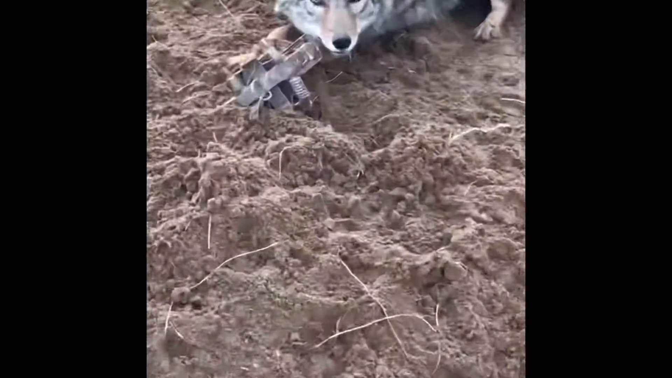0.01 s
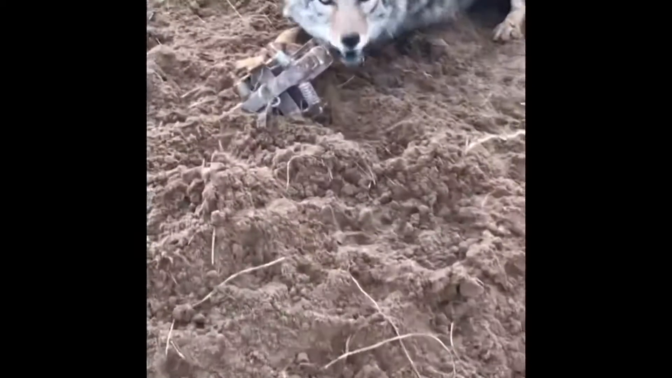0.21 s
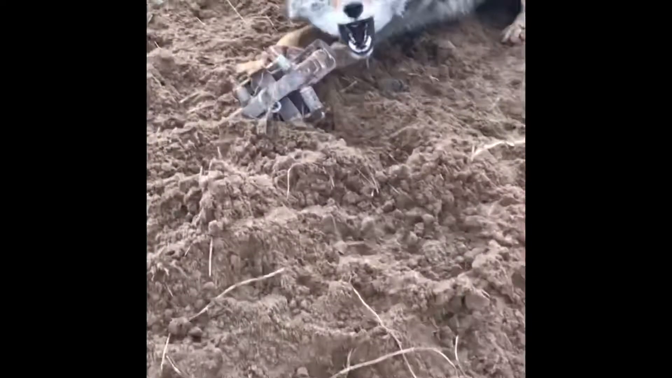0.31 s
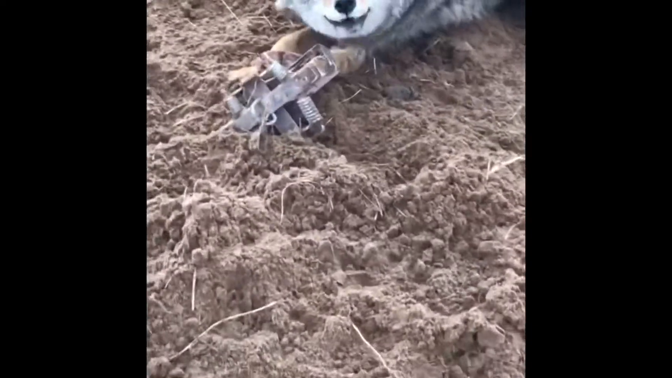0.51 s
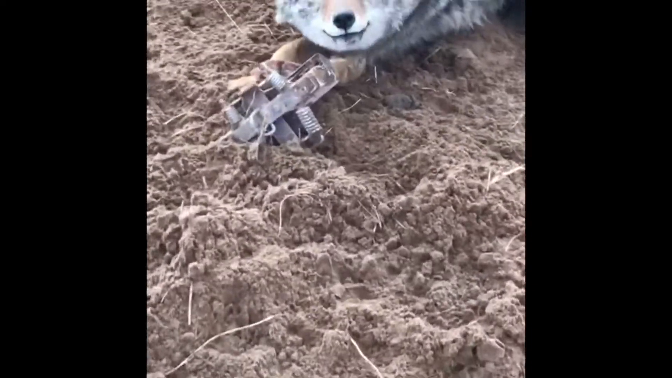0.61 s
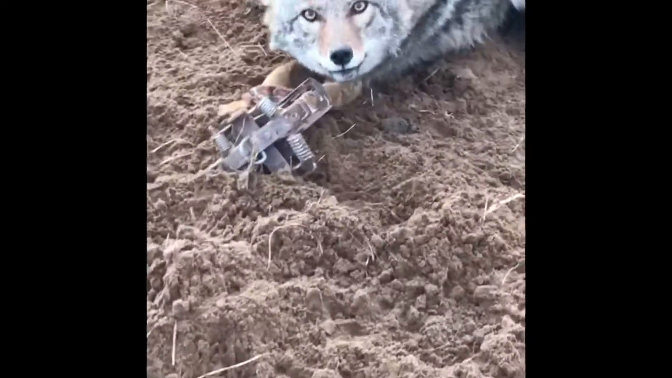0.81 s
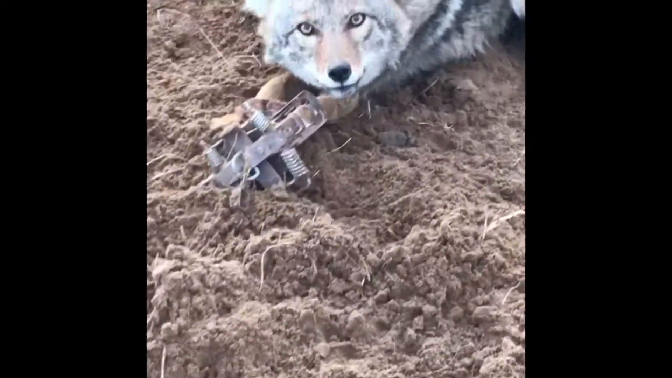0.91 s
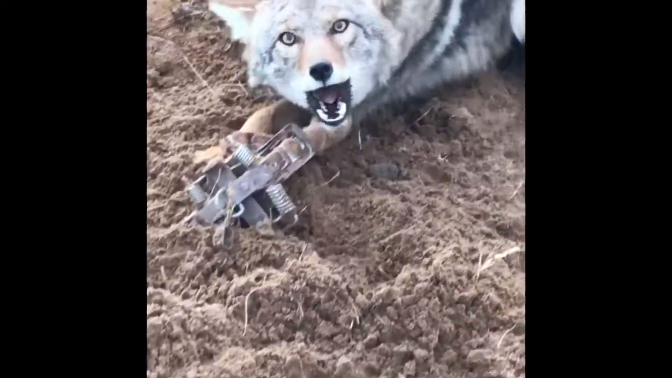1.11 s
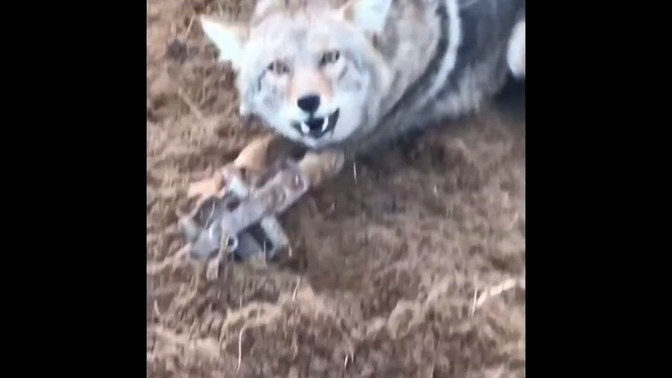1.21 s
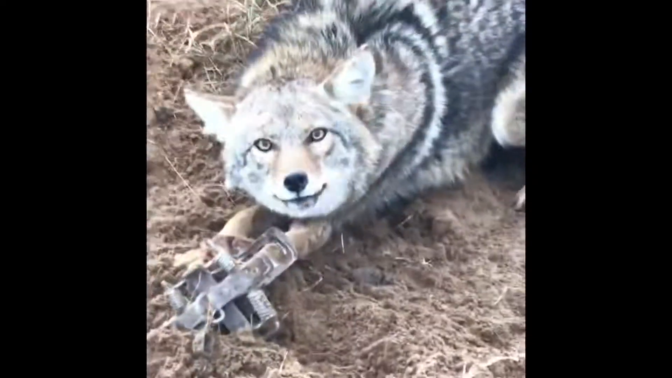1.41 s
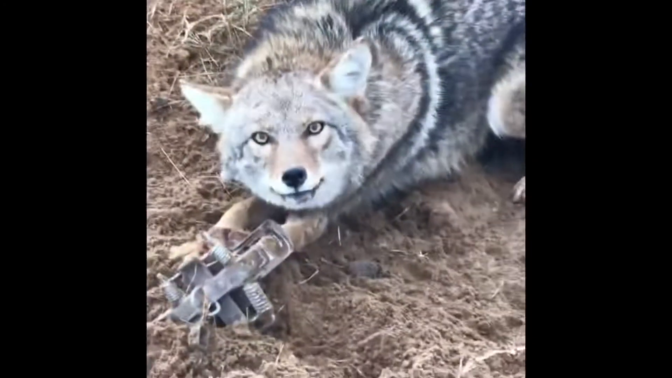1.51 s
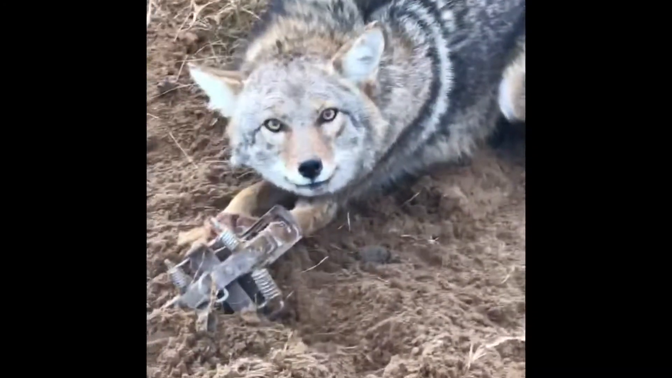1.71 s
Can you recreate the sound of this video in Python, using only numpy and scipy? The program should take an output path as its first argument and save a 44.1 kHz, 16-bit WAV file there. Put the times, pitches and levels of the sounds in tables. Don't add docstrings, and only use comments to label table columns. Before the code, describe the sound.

A coyote barks twice, close to a phone microphone in an open field. Each bark is short, rough and breathy, arching in pitch; low wind buffeting thumps between them over a faint steady hiss.

```python
import sys
import numpy as np
from scipy import signal
from scipy.io import wavfile
from scipy.ndimage import uniform_filter1d

SR = 44100
rng = np.random.default_rng(int(sys.argv[2]) if len(sys.argv) > 2 else 0)


def level_to_linear(level):
    exponent = np.asarray(level, float) / 20
    return 10 ** exponent


def materialize(psi):
    bounded = np.clip(np.atleast_2d(psi).T, -1, 1)
    quanta = np.round(bounded * 32767).astype(np.int16)
    wavfile.write(sys.argv[1], SR, quanta)


N = 79380

# frequency in Hz, level in dB per Hz.
HISS_COLOUR = [(60, -58), (250, -16.5), (550, -14), (1000, -2), (1400, -5), (2200, -20.5), (5000, -48),
               (16000, -51)]
# time in seconds, level in dB.
HISS_LEVEL = [(0, -46), (.6, -46.5), (.9, -44.5), (1.35, -44), (1.8, -44.5)]
# time in seconds, level in dB.
DRONE_LEVEL = [(0, -83.5), (.6, -67), (1.15, -54), (1.8, -55)]
DRONE_HZ, DRONE_WIDTH_HZ = 306, 206

# time in seconds, level in dB.
WIND_LEVEL = [(0.0, -44.5), (0.294, -35), (0.314, -44), (0.446, -22), (0.486, -39), (0.51, -19.5),
              (0.54, -12.5), (0.596, -33.5), (0.762, -31), (0.816, -30), (0.866, -33), (1.006, -20.5),
              (1.182, -40), (1.638, -37), (1.664, -43.5), (1.8, -35)]
# frequency in Hz, level in dB per Hz.
CALM_COLOUR = [(12, -70), (20, 4), (107, 3.5), (141, -0.5), (167, -4.5), (395, -18.5), (450, -19.5),
               (580, -55), (990, -120)]
GUST_COLOUR = [(12, -46.5), (20, -42.5), (54, 5.5), (102, -1.5), (315, -13), (381, -24), (844, -34),
               (900, -27.5), (1170, -71.5), (1980, -120)]
CALM_DB, GUST_DB, LUMPS_DB = -33, -22.5, 2.5
# start in seconds, peak in dB, ring in Hz, length in seconds.
EDDIES = [(0.381, -30, 75, 0.035), (0.413, -31, 124, 0.013), (0.438, -19, 78.2, 0.0084),
          (0.463, -27, 130.5, 0.0078), (0.51, -60, 142, 0.051), (0.529, -17.5, 91.6, 0.022),
          (0.545, -30, 73.3, 0.045), (0.511, -33, 302, 0.0054), (.537, -31.5, 374, .006),
          (0.792, -30.5, 66, 0.048), (1.648, -31.5, 77.2, 0.057), (1.728, -32, 55.6, 0.019)]

# time in seconds, fundamental in dB, overtones in dB, breath in dB,
# mouth opening from 0 to 1.
FOLDS_1 = [
    (.198, -51, -64, -78, 0),
    (0.218, -17, -23.5, -46.5, 0),
    (0.249, -7.5, -10.5, -26, 0.77),
    (0.265, -25.5, -13.5, -25.5, 0.73),
    (.29, -16, -12, -24, 0.89),
    (0.308, -22, -9.5, -26, 0.8),
    (.327, -21, -21.5, -34.5, 0.86),
    (0.34, -27.5, -35.5, -44.5, 0.6),
    (.385, -69, -60, -56, .6),
]
FOLDS_2 = [
    (.962, -43, -81.5, -96, 0.25),
    (.993, -19.5, -23, -41.5, 0.26),
    (1.022, -11.5, -9, -31.5, 0.63),
    (1.048, -13.5, -16.5, -19, 1),
    (1.074, -19.5, -9.5, -20.5, 0.79),
    (1.091, -21, -13, -26, 0.87),
    (1.104, -24.5, -24.5, -33.5, 1),
    (1.113, -29.5, -29.5, -45.5, 0.47),
    (1.15, -41, -50, -63, 0.52),
]
# time in seconds, pitch in Hz.
PITCH_1 = [(.198, 385), (.217, 402), (.249, 455), (.264, 451), (.29, 431), (.309, 384), (.327, 358),
           (.339, 335), (.385, 294)]
PITCH_2 = [(.962, 286), (.993, 334), (1.022, 415), (1.045, 468), (1.055, 461), (1.069, 433), (1.078, 398),
           (1.09, 330), (1.101, 282)]
# time in seconds, pitch in Hz, level in dB.
SECOND_1 = [
    (0.235, 516.3, -33),
    (0.262, 604, -3.5),
    (0.289, 654.4, -5),
    (0.311, 628.4, -23.5),
    (0.326, 716, -20),
    (0.334, 710, -33.5),
]
SECOND_2 = [
    (0.982, 475, -40.5),
    (0.992, 512, -24.5),
    (1.002, 553.8, -18.5),
    (1.042, 621.6, -10.5),
    (1.051, 649, -13),
    (1.066, 620, -78),
]
# multiple of its pitch, level in dB.
SECOND_TONES = [(1, 3.5), (2, -6), (3, -14.5), (4, -18.5)]
# time in seconds, noise share from 0 to 1, strong-weak pulse share from 0 to 1.
ROUGH_1 = [(.2, .6, .3), (.245, .7, .25), (.27, .75, .2), (.31, .65, .2), (.335, .6, .1), (.345, .9, 0)]
ROUGH_2 = [(.97, .75, .15), (1.042, .72, .1), (1.054, .04, 0), (1.082, .04, 0), (1.092, .2, .2),
           (1.104, .3, .1), (1.113, .85, 0)]
# time in seconds, opening from 0 to 1.
LIPS_1 = [(.21, .95), (.225, 0.83), (.25, 0.44), (.265, 0.9), (.285, 0.94), (.31, 0.87), (.325, 0.98),
          (.35, 0.6)]
LIPS_2 = [(.98, .5), (1.005, .55), (1.03, 0.74), (1.042, 0.85), (1.065, 0.93), (1.085, 0.88), (1.105, 0.79),
          (1.13, .55)]
FOLD_JITTER = (.025, .003)
SECOND_JITTER = (.02, .022)
# resonance in Hz, width in Hz, level in dB, share it drops when shut.
THROAT = [(669, 400, 0, 0.29), (908, 150, -2, 0.29), (1330, 429, 5.5, 0.3), (1875, 350, 3, 0.19),
          (2323, 310, -1.5, 0.14), (2634, 330, -13, 0.043), (3076, 400, -10, 0.081)]
# time in seconds, resonance in Hz, gain in dB, length in seconds.
SWELLS = [(0.227, 1870, 3, 0.0085), (.24, 1290, 2, 0.016), (0.286, 1290, 1.5, 0.021),
          (0.238, 904, 3, 0.011), (0.2736, 2300, 8, 0.026), (.25, 2965, 9, 0.015), (0.6, 2300, 0, .01),
          (1.025, 1870, 3.5, .01), (1.03, 2965, 6.5, .01), (1.05, 2300, 5.5, 0.018),
          (1.055, 1870, -14, 0.016), (1.066, 2700, 6.5, 0.012), (1.094, 1870, 3, 0.0072),
          (1.09, 1290, -2.5, 0.0044), (0.92, 2300, 0, 0.013)]
# resonance in Hz, width in Hz, level in dB,
# share it drops when shut.
PASSAGES = [(4400, 650, 3, 0.22), (6803, 890, 5, 0.25), (8926, 1200, 2, 0.22), (9940, 740, -7, .02),
            (11530, 1000, -7.5, 0.1), (14000, 3000, -9.5, 0.023)]
# time in seconds, frequency in Hz, gain in dB,
# length in seconds.
SURGES = [(.212, 9300, 4.5, .005), (.222, 6700, 4, 0.013), (.243, 6700, 4.5, 0.0067), (.247, 9300, 5, 0.02),
          (.252, 4400, 7, 0.012), (.279, 4400, 9.5, 0.0072), (.278, 9300, 4.5, .008),
          (.292, 6700, 5.5, 0.0081), (.297, 4400, 10, 0.0085), (.32, 6700, 12.5, 0.0038),
          (.255, 14000, 5, .012), (1.012, 6700, 13.5, 0.0099), (1.02, 9300, 6, .014),
          (1.033, 6700, -9, 0.0056), (1.055, 9300, 6, 0.019), (1.06, 4400, 6.5, 0.0089),
          (1.062, 14000, 0.5, 0.0074), (1.075, 11200, 2.5, 0.023), (1.098, 6700, 9.5, 0.015),
          (1.005, 4400, -11, 0.012), (.36, 9300, -9.5, 0.031), (.365, 6700, -3, 0.018),
          (1.13, 9300, -3.5, 0.013), (1.13, 6700, -10, .016)]
COUPLING = .5
CHAOS = .2
PUFF_SHARE = 1.2
PULSES_IN_BREATH = .6
OPEN_AIR_DB, TONE_FLUTTER_DB = -17, 4.5
PATCHY_DB, THROAT_FLICKER_DB = 2.5, 3
SHUT_DB_PER_KHZ, WANDER = -2.5, .015
VOICE_CUT_HZ, THROAT_TOP_HZ = 330, 3400

FIELD_HZ, FIELD_WIDTH_HZ, FIELD_DB, FIELD_T60_S = 3880, 1300, -40, .22

# time in seconds, level in dB.
INTAKE = [
    (.92, -85),
    (.94, -72),
    (.965, -72),
    (.982, -66),
    (.995, -90),
]
# frequency in Hz, width in Hz, level in dB.
INTAKE_LINES = [(4640, 250, 0), (9800, 400, -8.5)]
# time in seconds, peak in dB.
CREAK = [(1.1258, -45), (1.1374, -49), (1.1518, -47), (1.1702, -60), (1.1847, -58), (1.1914, -62),
         (1.2034, -58), (1.2101, -55), (1.2276, -50), (1.2441, -51), (1.2625, -57), (1.2805, -54),
         (1.2924, -62), (1.3194, -58), (1.3374, -67)]
# frequency in Hz, width in Hz, level in dB.
CREAK_MODES = [(3570, 850, 1.5), (3960, 600, 1)]

DUCK_FROM_DB, DUCK_SHARE, RECOVER_DB_PER_S = -21, .3, 61
MIC_CUT_HZ, EDGE_HZ = 51, 15780
LIMIT, SELF_NOISE_DB = 1.12, -77


def evened(x):
    return x / np.sqrt(np.mean(x ** 2) + 1e-20)


def read(points, hz):
    f, value = np.transpose(points)
    return np.interp(np.log(hz + 1), np.log(f + 1), value)


def add(mix, s, sound):
    part = mix[round(s * SR):][:len(sound)]
    part += sound[:len(part)]


def columns(table, t):
    rows = np.transpose(table)
    return [np.interp(t, rows[0], c) for c in rows[1:]]


def resonate(x, hz, width):
    turn = np.exp(2j * np.pi * np.cumsum(hz * np.ones(len(x))) / SR)
    r = np.exp(-np.pi * abs(width) / SR)
    return 2 * (turn * signal.lfilter([1 - r], [1, -r], x / turn)).real


def resonate_twice(x, hz, width):
    return resonate(resonate(x, hz, width), hz, width)


def highpass(x, hz):
    return signal.sosfilt(signal.butter(2, hz, "high", fs=SR, output="sos"), x)


def wobble(count, size=150):
    return evened(uniform_filter1d(uniform_filter1d(rng.standard_normal(count), size), size))


def noise(spectrum, size=1024, patchy_db=0.):
    hz = np.fft.rfftfreq(size, 1 / SR)
    real, imag, patches = rng.standard_normal((4 * N // size + 5, len(hz), 3)).T
    patches = evened(uniform_filter1d(uniform_filter1d(patches, size=8, axis=0), size=10, axis=1))
    frames = (real + 1j * imag) * level_to_linear(read(spectrum, hz)[:, None] + patchy_db * patches)
    return evened(signal.istft(frames, nperseg=size, noverlap=3 * size // 4)[1][:N])


def hiss():
    t = np.arange(N) / SR
    drone = evened(resonate_twice(rng.standard_normal(N), DRONE_HZ, DRONE_WIDTH_HZ))
    wash = noise(HISS_COLOUR, patchy_db=1.3)
    return level_to_linear(columns(HISS_LEVEL, t)[0]) * wash + level_to_linear(columns(DRONE_LEVEL, t)[0]) * drone


def wind():
    level_db = columns(WIND_LEVEL, np.arange(N) / SR)[0]
    gustiness = np.clip((level_db - CALM_DB) / (GUST_DB - CALM_DB), 0, 1)
    calm = noise(list(CALM_COLOUR) + [(1500, -100), (5000, -140)], size=2048)
    gust = noise(list(GUST_COLOUR) + [(2500, -100), (5000, -140)], size=2048)
    rumble = np.sqrt(1 - gustiness) * calm + np.sqrt(gustiness) * gust
    out = level_to_linear(level_db - 4 + LUMPS_DB * wobble(N, size=500)) * rumble
    for s, db, hz, length in EDDIES:
        t = np.arange(0, 2 * length, 1 / SR)
        u = t / length
        swell = 4 * u * np.exp(-3 * u) * (1 - u / 2)
        ring = np.sin(2 * np.pi * hz * t * (1 - 0.12 * u))
        add(out, s, -level_to_linear(db + 12.0) * swell * ring)
    return out


def tract(drive, table, mouth, patchy_db=0., shut_db=0., surges=(), t=0):
    out = np.zeros(len(drive))
    for k, (f, width, db, drop) in enumerate(table):
        wander = WANDER * patchy_db / 3 * wobble(len(drive), size=400)
        centre = f * (1 - drop * (1 - mouth) + wander)
        band = resonate(resonate_twice(drive, centre, width), centre, 2 * width)
        surge_db = sum(gain_db * np.exp(-((t - s) / length) ** 2)
                       for s, hz, gain_db, length in surges if abs(hz / f - 1) < .08)
        muffle_db = shut_db * f / 1000 * (1.5 - mouth)
        flicker_db = patchy_db * wobble(len(drive), size=160)
        out += (-1) ** k * level_to_linear(db + surge_db + muffle_db + flicker_db) * band
    return evened(out)


def bark(folds, pitch, second, rough, lips, fold_jitter, second_jitter):
    t = np.arange(folds[0][0], folds[-1][0], 1 / SR)
    first_db, over_db, breath_db, mouth = columns(folds, t)
    hz = uniform_filter1d(columns(pitch, t)[0], size=200)
    rough, halved = columns(rough, t)
    lip_spread = columns(lips, t)[0]
    onset = (second[0][0] - .01, second[0][1], -70)
    ending = (second[-1][0] + 0.023, second[-1][1], -70)
    high_hz, high_db = columns([onset] + list(second) + [ending], t)

    turns = np.cumsum(hz * (1 + fold_jitter * wobble(len(t)))) / SR
    high = np.cumsum(high_hz * (1 + second_jitter * wobble(len(t)))) / SR
    share = np.minimum(level_to_linear(high_db - over_db), 1)
    slipping = turns + CHAOS * rough * wobble(len(t), size=70)
    pulses = evened(sum(np.cos(2 * np.pi * k * slipping) for k in range(2, 17)))
    beating = COUPLING * share * 2 * np.cos(2 * np.pi * high)
    strong_weak = 2 * halved * np.cos(np.pi * turns)
    pulses *= 1 + beating + strong_weak

    gate = PUFF_SHARE + np.exp(-(turns % 1) / .3) + share * np.exp(-(high % 1) / 0.17)
    low, air = gate * rng.standard_normal((2, len(t)))
    drive = np.sqrt(1 - rough) * pulses + np.sqrt(rough) * .7 * evened(low)
    drive = signal.sosfilt(signal.butter(4, THROAT_TOP_HZ, fs=SR, output="sos"), drive)
    throat = tract(drive, THROAT, mouth, THROAT_FLICKER_DB * rough, SHUT_DB_PER_KHZ, surges=SWELLS, t=t)

    breath_drive = evened(air) + PULSES_IN_BREATH * (1 - rough) * pulses
    breath = tract(breath_drive, PASSAGES, lip_spread, PATCHY_DB, surges=SURGES, t=t)
    breath += level_to_linear(OPEN_AIR_DB) * evened(np.diff(low, prepend=0))

    first_db = first_db + TONE_FLUTTER_DB * rough * wobble(len(t), size=80)
    fundamental = -np.sqrt(2) * np.cos(np.pi * (turns + slipping))
    high_db = high_db + TONE_FLUTTER_DB * rough * wobble(len(t), size=60)
    tones = -np.sqrt(2) * sum(level_to_linear(db) * np.cos(2 * np.pi * round(k) * high) for k, db in SECOND_TONES)

    voice = level_to_linear(over_db + 4.0) * throat + level_to_linear(breath_db) * breath
    voice += level_to_linear(first_db) * fundamental + level_to_linear(high_db) * tones
    fade = np.minimum(np.minimum((t - t[0]) / 0.01, (t[-1] - t) / 0.016), 1)
    return t[0], fade * highpass(voice, VOICE_CUT_HZ)


def field(x):
    t = np.arange(SR // 3) / SR
    scatter = resonate_twice(rng.standard_normal(len(t)), FIELD_HZ, FIELD_WIDTH_HZ)
    tail = scatter * level_to_linear(-60 * t / FIELD_T60_S) * (t > .006)
    return level_to_linear(FIELD_DB) * signal.fftconvolve(x, tail / np.linalg.norm(tail))[:N]


def intake():
    draught = rng.standard_normal(N)
    air = sum(level_to_linear(db) * evened(resonate_twice(draught, f, w)) for f, w, db in INTAKE_LINES)
    s, db = np.transpose(INTAKE)
    return level_to_linear(np.interp(np.arange(N) / SR, s, db, -140, -140)) * air


def creak():
    tick = np.eye(1, 400)[0]
    ring = sum(level_to_linear(db) * resonate(resonate_twice(tick, f, w), f, 2 * w) for f, w, db in CREAK_MODES)
    out = np.zeros(N)
    for s, db in CREAK:
        add(out, s, level_to_linear(db + 4) * ring / abs(ring).max())
    return out


def scene():
    coyote = intake() + creak()
    first = (FOLDS_1, PITCH_1, SECOND_1, ROUGH_1, LIPS_1, FOLD_JITTER[0], SECOND_JITTER[0])
    second = (FOLDS_2, PITCH_2, SECOND_2, ROUGH_2, LIPS_2, FOLD_JITTER[1], SECOND_JITTER[1])
    for call in (first, second):
        add(coyote, *bark(*call))
    return (coyote + field(coyote) + hiss() + wind())[None]


def band_limit(x):
    return signal.sosfilt(signal.butter(12, 15890, fs=SR, output="sos"), x)


def record(dry):
    power_db = 10 * np.log10(abs(uniform_filter1d(dry[0] ** 2, size=600)) + 1e-12)
    fall = np.arange(N) * RECOVER_DB_PER_S / SR
    held_db = np.maximum.accumulate(power_db + fall) - fall
    over_db = np.maximum(held_db - DUCK_FROM_DB, 0)
    ducked = highpass(dry, MIC_CUT_HZ) / level_to_linear(DUCK_SHARE * uniform_filter1d(over_db, size=400))
    limited = LIMIT * np.tanh(ducked / LIMIT)
    held = np.clip(limited + level_to_linear(SELF_NOISE_DB) * rng.standard_normal(N), -1, 1)
    edge = signal.firwin(1023, EDGE_HZ, window=("kaiser", 9), fs=SR)
    return band_limit(signal.oaconvolve(held, edge[None], "same"))


dry = scene()
out = record(dry)
materialize(out)
```